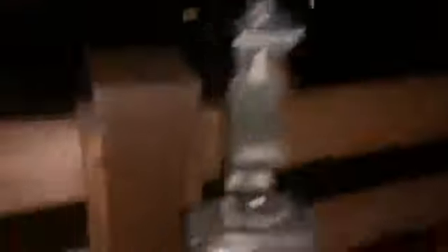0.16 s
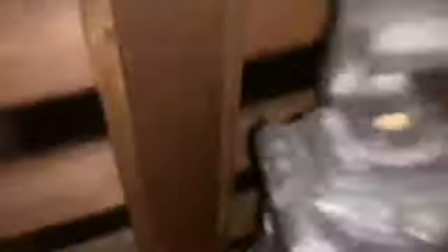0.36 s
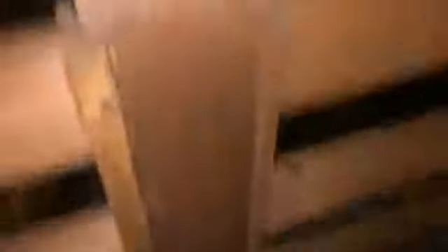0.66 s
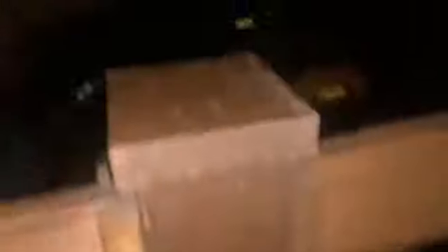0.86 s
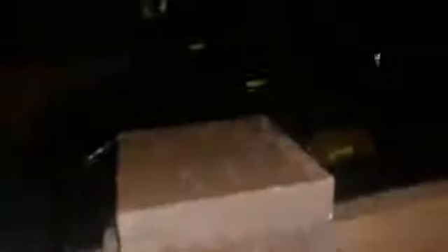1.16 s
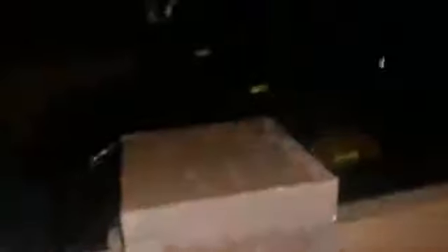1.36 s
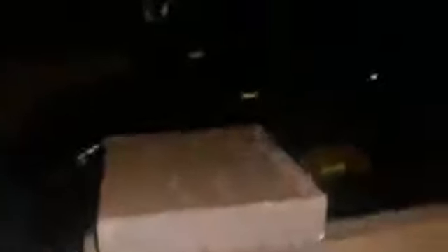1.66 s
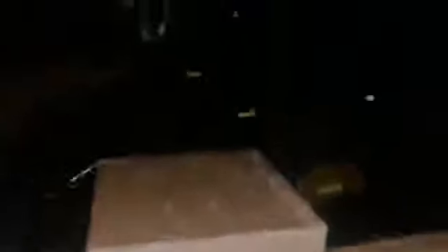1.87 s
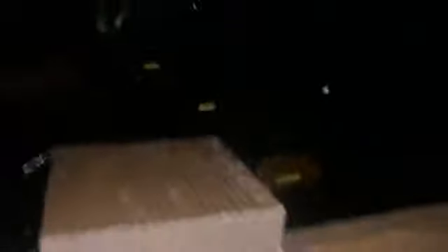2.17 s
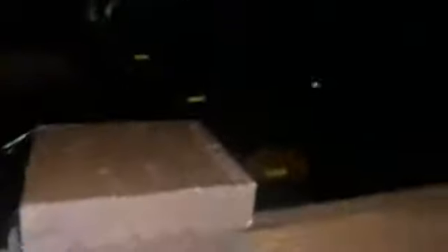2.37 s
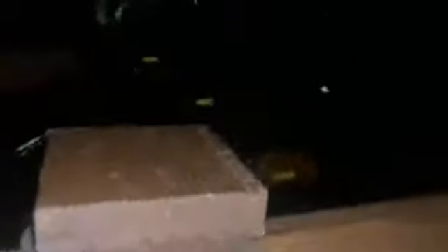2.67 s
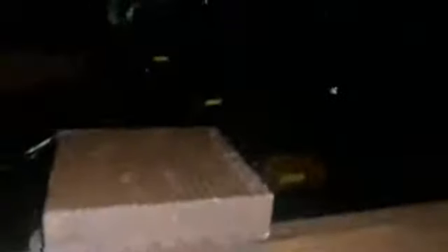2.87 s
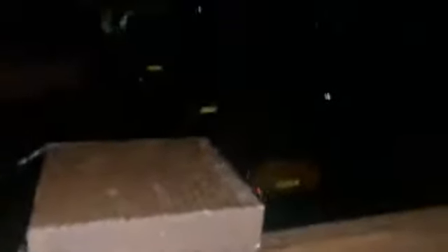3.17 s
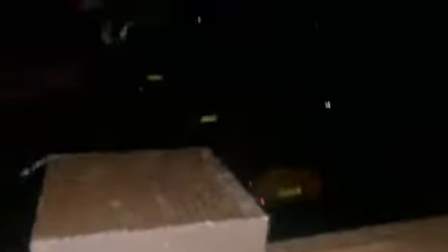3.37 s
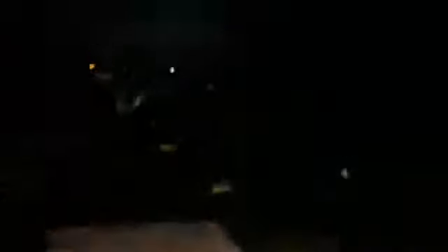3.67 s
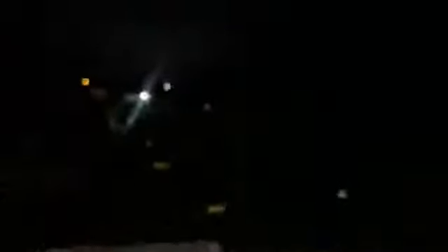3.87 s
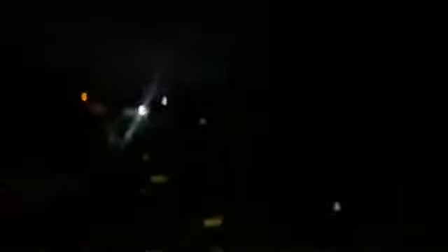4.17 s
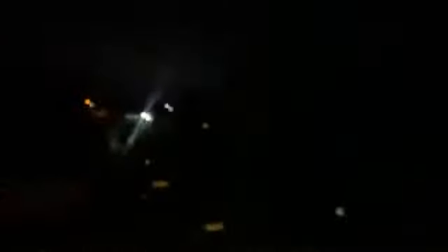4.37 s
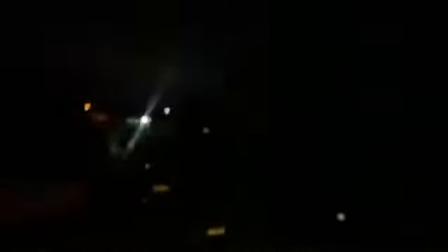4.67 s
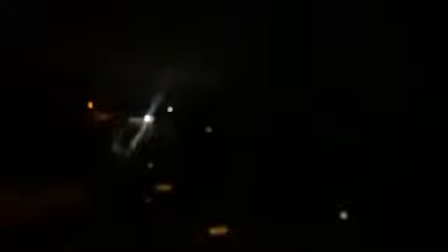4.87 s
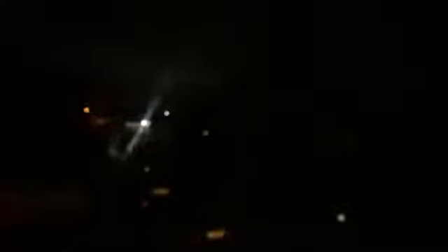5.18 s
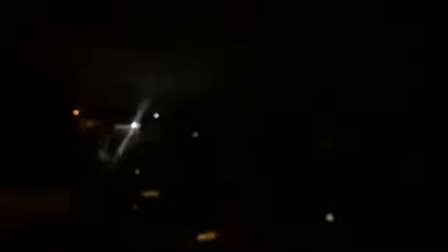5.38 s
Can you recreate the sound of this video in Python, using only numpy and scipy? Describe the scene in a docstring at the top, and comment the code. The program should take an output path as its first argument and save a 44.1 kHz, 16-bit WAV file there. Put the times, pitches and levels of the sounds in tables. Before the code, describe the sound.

Close mono phone capture under an umbrella in driving rain. First a quiet brush of fabric, nearly a pause, then dense irregular tapping: hollow, popping drops on tight cloth, each a tiny falling chirp with a thud behind. Wind throws sheets of finer drops and makes the canopy rumble. A sharp bright splat lands beside the microphone near five seconds; sliding cloth follows. Very faint high hiss stays behind.

```python
"""Big drops of wind-driven rain batter an umbrella held just above a phone's microphone, outdoors in a storm.
Each drop sends a bending wave through the taut cloth: treble arrives first, so a tap is a quick falling chirp
with a dull thump behind it. Gusts drag and shake the cloth and throw sheets of small drops, filtered-noise
patter and spray between the big ones. Cloth rustles on the ribs, a few drops strike the microphone housing
itself, and a faint steady hiss lies behind it all; a limiter holds the loudest taps."""
import sys
import numpy as np
from scipy import signal
from scipy.fft import rfft, irfft
from scipy.io import wavfile
from scipy.ndimage import uniform_filter1d, minimum_filter1d

SR = 44100
rng = np.random.default_rng(int(sys.argv[2]) if len(sys.argv) > 2 else 0)


def generate_wav(sig):
    """Save sig (samples, or channels by samples) to the path in sys.argv[1] as 16-bit PCM at SR."""
    pcm = np.round(np.clip(np.atleast_2d(sig).T, -1, 1) * 32767).astype(np.int16)
    wavfile.write(sys.argv[1], SR, pcm)


N = 243431  # samples
TIME = np.arange(N) / SR  # seconds
SIZE, LEAD = 4096, 512  # samples in one short sound, and the sample in it that marks its moment
FREQS = np.maximum(np.fft.rfftfreq(SIZE, 1 / SR), 1)  # Hz

# travel time in seconds of a 1 kHz wave to the microphone; how it grows toward the bass
LAG_S, LAG_POWER = 0.001772, 0.85

# Colour of the shaking canopy. Each row: frequency in Hz, relative level in dB.
RUMBLE_COLOUR = [(20, -25), (32, -22), (50, 0), (75, 7), (115, 6), (170, 2), (240, 4), (340, -8),
                 (500, -22.5), (900, -59.5)]
# Sheets of small drops thrown by the gusts.
# Each row: start in seconds, length in seconds, relative patter level in dB, relative spatter level in dB.
DROP_SHEETS = [(0.761, 0.052, -28, -48), (0.838, 0.01, -18, -51), (1.057, 0.073, -21.5, -39.5),
               (1.205, 0.09, -35.5, -51), (1.43, 0.047, -27, -41.5), (1.578, 0.027, -21, -43),
               (1.685, 0.058, -24, -45), (1.892, 0.11, -33, -47.5), (2.108, 0.18, -28.5, -61),
               (2.317, 0.038, -17, -39.5), (2.473, .1, -22.5, -38.5), (2.612, 0.013, -27, -55),
               (2.702, 0.13, -26.5, -47), (2.815, 0.056, -17.5, -37), (2.913, 0.082, -27, -42),
               (3.085, 0.14, -17.5, -41), (3.443, 0.067, -17, -31), (3.577, 0.11, -26, -49.5),
               (3.81, .027, -29, -51), (3.943, 0.075, -25.5, -45), (4.073, 0.004, -16, -27),
               (4.186, 0.024, -29.5, -52), (4.254, 0.036, -19, -39), (4.455, 0.024, -20.5, -41),
               (4.519, 0.047, -24, -37.5), (4.779, 0.058, -24.5, -43.5), (5.1, 0.2, -25.5, -47),
               (5.497, 0.011, -16, -41)]


def big_drops(tap_db=0.0, contact_db=-12, thump_db=3.5, snap_db=-2, tick_db=4, ring_db=-14, echo_db=-16,
              thump_hz=225, thump_octaves=0.78, snap_hz=1850):
    """Each drop ticks, snaps, chirps and thumps; the ribs send part back and the canopy shudders on."""
    # Big drops on the canopy. Each row: time of the tap in seconds, tap level in dB, tap pitch in Hz,
    # tap width in octaves, thump level in dB, snap level in dB, splash tick level in dB (levels are relative).
    drop_rows = [(0.446, -25.5, 624, 0.48, -43, -44, -61), (0.573, -23.5, 656, 0.23, -32, -45, -71),
                 (0.608, -24.5, 626, 0.42, -38, -44, -72), (0.716, -8.5, 706, 0.35, -24, -50, -63),
                 (0.746, -3, 763, 0.63, -25, -23, -43.5), (0.777, -15.5, 630, 0.21, -28.5, -38, -50.5),
                 (0.841, -8.5, 830, 0.14, -29.5, -41, -60.5), (0.884, -18, 755, 0.13, -23.5, -34, -53),
                 (1.044, -7, 636, 0.6, -14.5, -23, -51), (1.07, -8.5, 720, 0.19, -22, -28, -56),
                 (1.127, -7, 712, 0.37, -15, -40, -39), (1.208, -8, 537, 0.61, -14.5, -23, -35),
                 (1.287, -12, 820, 0.27, -22, -44, -42.5), (1.344, -21.5, 666, 0.42, -26.5, -33, -58),
                 (1.39, -18.5, 704, 0.41, -22, -34.5, -51), (1.425, -8.5, 850, 0.18, -22.5, -35, -45),
                 (1.46, -15, 697, 0.19, -27, -43, -41.5), (1.496, -17.5, 674, 0.24, -29, -46, -49),
                 (1.54, -12.5, 574, 0.63, -28, -35, -58), (1.6, -11, 540, 0.58, -14, -40, -72),
                 (1.67, -10, 546, 0.69, -19, -24, -41), (1.694, -7.5, 688, 0.63, -15.5, -24, -40),
                 (1.705, -7, 621, 0.23, -28, -16.5, -43), (1.737, -1.5, 679, 0.7, -17, -33, -33.5),
                 (1.827, -12, 463, 0.68, -17, -48, -75), (1.883, -8.5, 732, 0.5, -21, -22, -34),
                 (1.895, -6, 635, 0.27, -15, -11.5, -36), (1.967, -21.5, 660, 0.16, -44, -16.5, -39.5),
                 (2.003, -11, 661, 0.12, -22, -30, -57), (2.096, -7.5, 566, 0.49, -15.5, -38, -48),
                 (2.124, -7, 435, 0.73, -24, -19, -45), (2.135, -3.5, 635, 0.53, -16, -32, -48),
                 (2.185, 5, 591, 0.63, -11.5, -19, -26), (2.237, -15.5, 690, 0.53, -24, -53, -62),
                 (2.314, -1.5, 453, 0.86, -9.5, -34, -41.5), (2.34, -5, 683, 0.54, -19, -30, -42),
                 (2.387, -2, 799, 0.65, -14.5, -35, -35), (2.448, -18, 470, 0.89, -26, -34, -45),
                 (2.479, -8, 736, 0.63, -23, -32, -57), (2.494, -7.5, 842, 0.52, -22, -39, -66),
                 (2.541, -12, 700, 0.58, -18.5, -40, -58), (2.552, -11, 785, 0.23, -23, -44, -67),
                 (2.626, -7, 385, 0.58, -18.5, -32, -49), (2.687, -16, 370, 0.17, -28, -41, -66),
                 (2.704, 2, 904, 0.28, -32, -25, -41.5), (2.717, -3.5, 638, 0.62, -20.5, -30, -43),
                 (2.748, -4, 852, 0.57, -25, -29, -45), (2.836, -5.5, 824, 0.79, -25, -20, -29.5),
                 (2.871, -3, 717, 0.65, -21, -32, -48), (2.912, -8, 657, 0.47, -15.5, -15.5, -38.5),
                 (2.987, -5.5, 696, 0.47, -16.5, -18.5, -40), (3.046, -4, 713, 0.53, -31, -31, -33),
                 (3.064, -6, 652, 0.38, -16, -33, -58), (3.117, -13.5, 795, 0.69, -19, -42, -60),
                 (3.151, -5, 766, 0.42, -30, -12.5, -36.5), (3.216, -11, 732, 0.6, -19, -27, -59),
                 (3.276, -10, 729, 0.63, -22, -17, -45), (3.339, -15, 793, 0.34, -32, -22.5, -36.5),
                 (3.391, -18.5, 383, 1, -26, -26, -38), (3.429, -2, 765, 0.51, -20, -23, -52),
                 (3.467, 0, 820, 0.28, -39, -34, -47), (3.582, 1.5, 631, 0.56, -20, -8, -30.5),
                 (3.666, -8.5, 674, 0.52, -22, -37, -61), (3.822, -17, 652, 0.27, -31, -42, -71),
                 (3.935, -18, 540, 0.15, -30, -21, -50.5), (3.961, -5.5, 801, 0.48, -19, -26, -47),
                 (3.983, -5.5, 708, 0.28, -18.5, -42, -66), (4.03, -5.5, 513, 0.2, -19, -22, -63),
                 (4.084, -3.5, 460, 0.43, -14, -32, -56), (4.162, -10, 432, 0.72, -26, -35, -68),
                 (4.189, -13.5, 524, 0.82, -19.5, -30, -59.5), (4.262, -5.5, 555, 0.31, -14.5, -21, -68),
                 (4.326, -11, 530, 0.35, -19, -55.5, -69), (4.345, -9.5, 454, 0.7, -22, -28.5, -54),
                 (4.385, -22.5, 546, 0.74, -27, -42, -66), (4.442, -11, 481, 0.25, -25, -56, -67),
                 (4.462, -5, 447, 0.28, -21, -50, -71), (4.538, 0.5, 593, 0.31, -33, -10, -49),
                 (4.55, -3.5, 454, 0.35, -15, -31, -39.5), (4.621, -13.5, 540, 0.57, -30.5, -50, -62),
                 (4.679, -13, 726, 0.62, -30, -22, -50), (4.737, -9.5, 592, 0.24, -15, -30, -49),
                 (4.762, -5, 613, 0.5, -25, -27, -51), (4.976, -10.5, 912, 0.56, -23.5, -16, -37.5),
                 (4.991, 1, 868, 0.28, -28, -9.5, -21), (5.006, -3, 808, 0.18, -23.5, -14, -26),
                 (5.058, -9.5, 553, 0.58, -17.5, -43, -53), (5.076, -9.5, 525, 0.62, -38, -33, -55),
                 (5.124, -12.5, 652, 0.61, -29, -43, -48), (5.333, -1, 524, 0.83, -7.5, -44, -39),
                 (5.405, -11, 765, 0.24, -24, -43.5, -48), (5.5, -24, 585, 0.32, -16, -40, -60)]
    # Colour of a drop's splash. Each row: frequency in Hz, relative level in dB.
    tick_colour = [(1500, 9), (2900, 15), (4200, -1), (5600, -5), (7300, -1), (8800, -10.5), (10800, -3),
                   (12500, -9), (14000, -25.5), (16000, -32)]
    # glide in seconds of a 1 kHz tap; higher taps come from further across the cloth
    glide_1k_s, glide_power = 0.00301, 1.315
    out = np.zeros(N)
    for s, tap, hz, octaves, thump, snap, tick in list(drop_rows) + stray_drops():
        turn = rng.uniform(0, 2 * np.pi)
        glide_s = glide_1k_s / travel(hz) ** glide_power
        landing = s - LAG_S * travel(hz)  # the drop lands before its tap has crossed the cloth
        snap_s = landing + LAG_S * travel(snap_hz)
        thump_s = landing + LAG_S * travel(thump_hz)
        echo_s = s + 0.0026 + 0.00593 * rng.random()

        add(out, undb(tick + tick_db) * burst(tick_colour, 0.0015), landing)
        add(out, undb(snap + snap_db) * bending_wave(snap_hz, 0.32, LAG_S, turn), snap_s)
        # the broad knock of first contact runs just ahead of the tuned tap
        add(out, undb(tap + contact_db) * bending_wave(1.438 * hz, 0.29, LAG_S, turn), s - 0.0015)
        add(out, undb(tap + tap_db) * bending_wave(hz, octaves, glide_s, turn), s)
        add(out, undb(thump + thump_db) * bending_wave(thump_hz, thump_octaves, LAG_S, turn), thump_s)
        add(out, undb(tap + echo_db) * bending_wave(1.1 * hz, octaves, 2.2 * glide_s, turn), echo_s)
        add(out, undb(thump + ring_db) * burst(RUMBLE_COLOUR, 0.029), s)
    return out


def stray_drops(count=60, start_s=0.73, tap_db=-24, spread_db=3, spread_octaves=0.2, octaves=0.19,
                thump_db=-12, snap_db=-27, tick_db=-46):
    """Lighter drops that land at random once the rain drives in; rows like those of the big ones."""
    times = rng.uniform(start_s, N / SR, count)
    size, place = np.clip(rng.standard_normal((count, 2)), -2, 2).T
    taps = tap_db + spread_db * size
    pitches = cloth_pitch(times) * 2 ** (spread_octaves * place)
    return [(s, tap, hz, octaves, tap + thump_db, tap + snap_db, tap + tick_db)
            for s, tap, hz in zip(times, taps, pitches)]


def bending_wave(hz, octaves, glide_s, turn):
    """A band of an impact after crossing the cloth, low waves last; peak about 1, near sample LEAD."""
    band = np.exp(-0.5 * (np.log2(FREQS / hz) / octaves) ** 2)
    delay = glide_s * (travel(FREQS) - travel(hz))
    # summing delay over frequency gives the phase that holds each frequency back by that delay
    phase = 2 * np.pi * np.cumsum(delay + LEAD / SR) * SR / SIZE
    wave = np.fft.ifft(band * np.exp(1j * (turn - phase)), SIZE)
    return wave.real / np.abs(wave).max()


def travel(hz):
    """Travel time of a bending wave relative to one of 1 kHz; below 60 Hz it grows no further."""
    return (1000 / np.maximum(hz, 60)) ** LAG_POWER


def cloth_pitch(s):
    """Pitch in Hz at which the canopy answers a small drop at time s, as wind tightens or slackens it."""
    # Tension of the cloth. Each row: time in seconds, pitch of the small drops in Hz.
    tension = [(0, 784), (1.1, 767), (1.6, 587), (2.3, 522), (2.55, 755), (3.5, 764), (4.0, 540),
               (4.45, 474), (4.8, 676), (5.12, 680), (5.25, 373), (5.5, 630)]
    return np.interp(s, *np.transpose(tension))


def near_splashes():
    """A few drops strike the microphone's housing itself, so close that their treble arrives."""
    # Each row: time in seconds, level in dB.
    splash_rows = [(1.88, -44), (4.9715, -66), (4.9886, -20.5), (5.0032, -36)]
    # Bright colour of these bursts. Each row: frequency in Hz, relative level in dB.
    bright_colour = [(2000, -17), (5000, -22), (6800, -4), (8900, -8), (10000, 13.5), (12300, 9),
                     (13200, 0), (16000, -19)]
    out = np.zeros(N)
    for s, db in splash_rows:
        add(out, undb(db) * burst(bright_colour, 0.0012), s)
    return out


def gusts(cloth_db=-0.5, rumble_db=-2.0, spatter_db=1.5, spray_db=-1.5, shake_db=-15, mist_db=-56):
    """Each gust drags the cloth, shakes the canopy and throws small drops and spray at it."""
    # Steady rain and wind between the sheets. Each row: time in seconds, then the relative levels in dB
    # of patter, canopy rumble, spatter and spray hiss.
    wind = [(0, -33.5, -41, -55, -57.5), (.31, -36.5, -44, -52, -56), (.41, -58, -50, -75, -77),
            (.46, -47, -51, -60, -60), (.53, -44.5, -45, -60, -59.5), (.57, -54, -47, -76, -72),
            (.7, -54.5, -48, -69, -80), (.8, -43, -37, -65.5, -71), (1.5, -36, -34.5, -61.5, -59.5),
            (2.05, -44, -41, -69.5, -68), (2.95, -42, -27, -70, -67), (3.36, -44, -32, -62, -62),
            (3.87, -42, -43.5, -67, -72.5), (4.3, -39.5, -31.5, -74.5, -71.5),
            (4.93, -41.5, -34.5, -79, -76), (5.1, -36, -27, -56, -58), (5.41, -32, -39, -53, -58),
            (5.52, -48, -33, -63, -72)]
    # Cloth sliding rather than drops. Each row: time in seconds, share of the power from 0 to 1.
    sliding = [(0, .72), (.5, .72), (.65, .12), (2.5, .2), (3.7, .2), (4.1, .45), (4.8, .55), (4.95, .3),
               (5.15, .82), (5.45, .65)]
    # Colours of the sliding cloth, of fine drops bursting on wet cloth, and of the spray.
    # Each row: frequency in Hz, relative level in dB.
    swish_colour = [(200, -5.5), (350, 4.5), (500, 4), (680, 8.5), (850, 9), (1050, -2.5), (1350, -10.5),
                    (1700, -22.5), (2200, -22.5), (2750, -28.5), (3400, -63)]
    spatter_colour = [(600, -3.5), (1200, 15), (1650, 11.5), (2100, -0.5), (2700, -9), (3200, -24.5),
                      (4000, -25.5), (6000, -61)]
    spray_colour = [(2500, 10.5), (4000, -4), (5500, -7.5), (7000, 1), (7900, -9), (8600, -14),
                    (9500, -2.5), (10600, -0.5), (11800, 2.5), (12700, -19), (13300, -19.5), (16000, -33)]
    release_s, shudder_s = 0.012, 0.035  # a sheet drains away; the canopy shakes on for longer
    rumble_slope, spray_slope = 0.53, 0.18  # dB of rumble and of spray per dB of a sheet's patter

    s, *columns = np.transpose(wind)
    _, _, force, wet = np.transpose(DROP_SHEETS)
    thrown = (sheet_levels(force, release_s),
              sheet_levels(rumble_slope * force + shake_db, shudder_s),
              sheet_levels(wet, release_s),
              sheet_levels(spray_slope * force + mist_db, release_s))
    # steady and thrown levels add in power
    levels = [np.hypot(undb(np.interp(TIME, s, column)), sheet) for column, sheet in zip(columns, thrown)]
    cloth_level, rumble_level, spatter_level, spray_level = levels

    share = np.clip(np.interp(TIME, *np.transpose(sliding)), 0, 1)
    flap = flutter(60, 5.45) * (1 - share ** 2) + share ** 2  # sliding cloth is steadier than flapping cloth
    flurry = flutter(35, 6) * (1 - share) + share  # the spray comes in flurries while the cloth flaps

    cloth = np.sqrt(1 - share) * patter() + np.sqrt(share) * noise(swish_colour)
    rumble = even(colour(impacts(350, 3.9), RUMBLE_COLOUR), 0.1)
    spatter = even(colour(impacts(450, 3.9), spatter_colour) + 0.31 * noise(spatter_colour), 0.12)
    spray = colour(impacts(1800, 3.6) + 0.35 * rng.standard_normal(N), spray_colour)

    out = flap * cloth_level * undb(cloth_db) * cloth
    out += flap * rumble_level * undb(rumble_db) * rumble
    out += flap * spatter_level * undb(spatter_db) * spatter
    return out + flurry * spray_level * undb(spray_db) * spray


def patter(rate=70, spread_db=5, low_hz=340, high_hz=950, octaves=0.26, focus_octaves=0.54):
    """Small drops on eight panels, the tighter the higher; those near the cloth's pitch answer most."""
    out, pitch = np.zeros(N), cloth_pitch(TIME)
    for hz in np.geomspace(low_hz, high_hz, 8):
        glide_s = LAG_S * rng.uniform(1.195, 2.624)
        chirp = bending_wave(hz, octaves, glide_s, rng.uniform(0, 2 * np.pi))
        answer = np.exp(-0.5 * (np.log2(hz / pitch) / focus_octaves) ** 2)
        out += signal.fftconvolve(answer * impacts(rate, spread_db), chirp)[LEAD:LEAD + N]
    return even(out, 0.048)


def sheet_levels(dbs, release_s):
    """Gain over time of all the sheets: each swells, holds its level and drains away."""
    attack_s = 0.012
    power = np.zeros(N)
    for (s, length, _, _), db in zip(DROP_SHEETS, dbs):
        attack = np.clip(1 + (TIME - s) / attack_s, 0, 1)
        release = np.exp(-np.clip((TIME - s - length) / release_s, 0, 20))
        power += (undb(db) * attack * release) ** 2
    return np.sqrt(power)


def rustles(rustle_db=0, ring_db=-28, width=0.093, frame_hz=7700):
    """The wet cloth rubs roughly over the metal ribs and sets them ringing faintly."""
    # Each row: middle in seconds, half length in seconds, rustle level in dB, pitch in Hz.
    rustle_rows = [(.237, 0.0064, -43.5, 1480), (0.496, 0.033, -61, 1820), (1.904, 0.059, -51, 2200),
                   (2.51, 0.057, -43, 1650), (2.834, 0.0078, -41, 3090), (2.839, 0.0028, -7.5, 1626),
                   (3.189, 0.014, -44, 1600), (3.98, .033, -58, 1870), (4.077, 0.0047, -32.5, 2410),
                   (4.271, .008, -38.5, 2370), (4.474, 0.009, -46.5, 2380), (4.798, .012, -44, 1980),
                   (5.122, 0.05, -53, 2400), (5.2, .03, -64, 2300), (5.274, 0.016, -58, 2220),
                   (5.413, 0.017, -52, 2280)]
    out, age = np.zeros(N), (np.arange(SIZE) - SIZE / 2) / SR
    for s, half_s, db, hz in rustle_rows:
        swell = np.exp(-0.5 * (age / half_s) ** 2) * signal.windows.tukey(SIZE)
        rub = undb(db + rustle_db) * resonance(hz, width)
        ring = undb(db + ring_db) * resonance(frame_hz, 0.037)
        add(out, swell * (rub + ring), s - (SIZE / 2 - LEAD) / SR)
    return out * flutter(120, 0.74)


def resonance(hz, width):
    """Noise in one resonance, width as a share of its pitch; rms 1."""
    shape = np.exp(-0.5 * (np.log(FREQS / hz) / width) ** 2)
    y = irfft(rfft(rng.standard_normal(SIZE)) * shape, SIZE)
    return y / y.std()


def hiss(level_db=-72.5):
    """Steady high hiss of the microphone: smooth coloured noise."""
    # Each row: frequency in Hz, relative level in dB.
    hiss_colour = [(3000, -25.5), (6000, -30), (7000, -10), (8800, -24), (9800, -3.5), (10600, 10),
                   (11900, 5), (12700, -16), (13200, -26), (16000, -28.5)]
    return undb(level_db) * noise(hiss_colour)


def flutter(rate_hz, depth_db):
    """A gain that wanders between random levels drawn rate_hz times a second; mean power 1."""
    steps = rng.standard_normal(size=2048)
    wander = np.interp(TIME * rate_hz, np.arange(len(steps)), steps)
    gain = undb(depth_db * np.clip(wander, -2, 2))
    return gain / np.sqrt(np.mean(gain ** 2))


def impacts(rate, spread_db):
    """Random impulses, rate a second, of widely differing sizes and either sign."""
    sizes = undb(spread_db * np.clip(rng.standard_normal(N), -2, 2))
    return (rng.random(N) < rate / SR) * sizes * rng.choice([-1, 1], N)


def burst(points, decay_s):
    """Coloured noise that starts at about level 1 and dies away."""
    age = (np.arange(SIZE) - LEAD) / SR
    fade = (age >= 0) * np.exp(-np.abs(age) / decay_s)
    return colour(rng.standard_normal(SIZE) * fade, points) * np.sqrt(np.mean(fade ** 2))


def noise(points):
    """Smooth noise of the given colour; rms 1."""
    return colour(rng.standard_normal(N), points)


def colour(x, points):
    """Filter by a (Hz, dB) spectrum; the result has rms 1."""
    hz, db = np.transpose(points)
    f = np.maximum(np.fft.rfftfreq(len(x), 1 / SR), 1)
    y = irfft(rfft(x) * undb(np.interp(np.log(f), np.log(hz), db)), len(x))
    return y / y.std()


def even(x, span_s):
    """Hold the rms near 1 over span_s seconds, keeping the finer grain."""
    k = max(int(span_s * SR), 2)
    power = uniform_filter1d(uniform_filter1d(x * x, k), k)
    return x / np.sqrt(np.abs(power) + 1e-12)


def add(out, x, s):
    """Mix x into out, with its sample LEAD at time s."""
    i = int(round(s * SR)) - LEAD
    a, b = max(i, 0), min(i + len(x), N)
    if b > a:
        out[a:b] += x[a - i:b - i]


def undb(db):
    """Decibels to gain."""
    return 10 ** (np.asarray(db) / 20)


def scene():
    """Big drops, close splashes and rustles over the gusts and a faint steady hiss; one channel."""
    return (big_drops() + near_splashes() + rustles() + gusts() + hiss())[None]


def record(dry):
    """A look-ahead limiter holds the hardest taps; then a steep low-pass cuts the top."""
    ceiling, top_hz = 0.68, 13200  # ceiling as a share of full scale, ahead of the low-pass
    hold = int(0.0025 * SR)
    gain = np.minimum(1, ceiling / (np.abs(dry) + 1e-9))
    # the minimum reaches ahead of each peak; two averages smooth the way down and up
    gain = uniform_filter1d(uniform_filter1d(minimum_filter1d(gain, 2 * hold), hold), hold)
    low_pass = signal.ellip(8, 0.2, 70, top_hz, fs=SR, output="sos")
    return signal.sosfilt(low_pass, dry * gain)


dry = scene()
out = record(dry)
generate_wav(out)
```